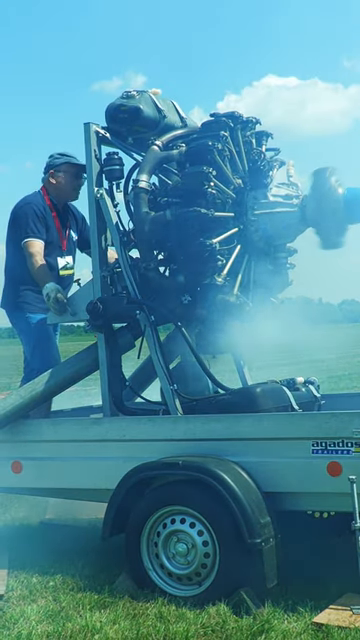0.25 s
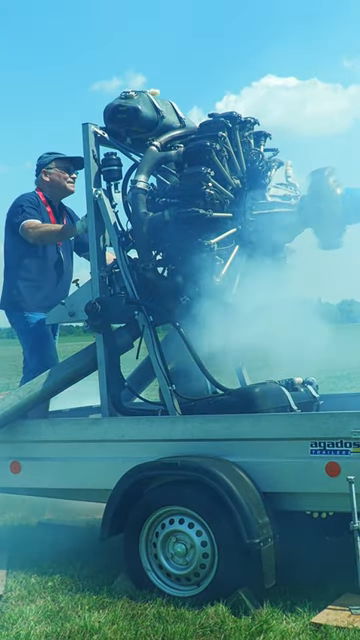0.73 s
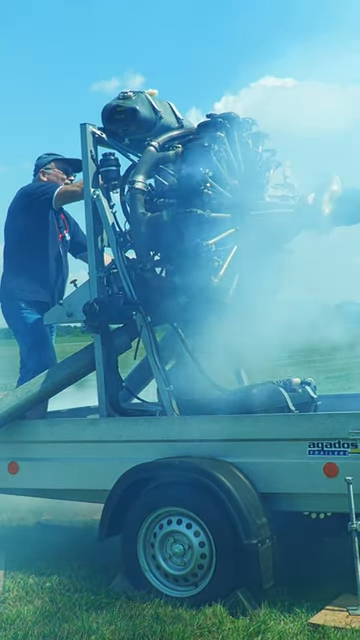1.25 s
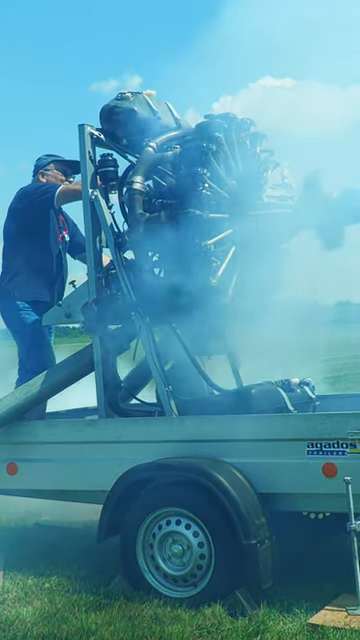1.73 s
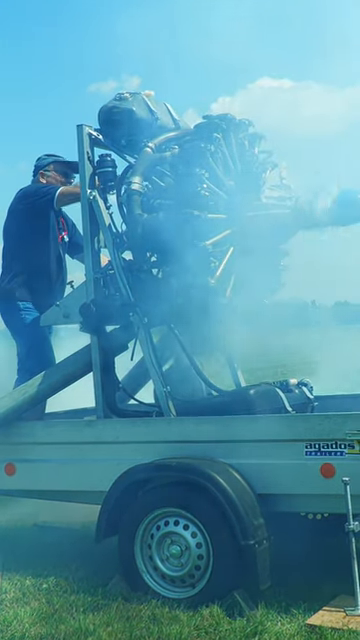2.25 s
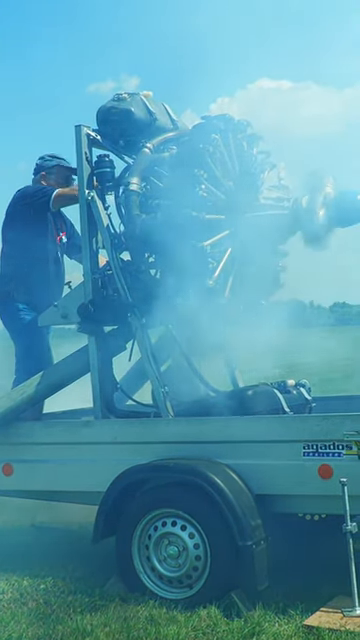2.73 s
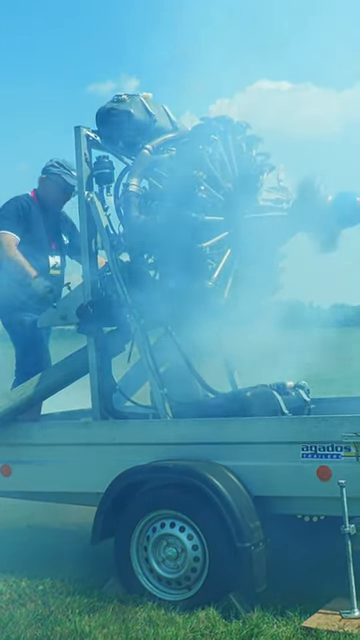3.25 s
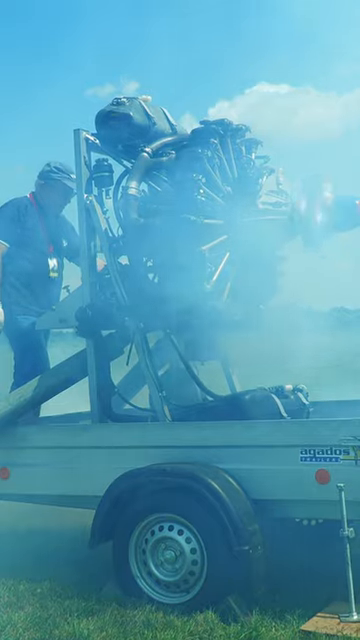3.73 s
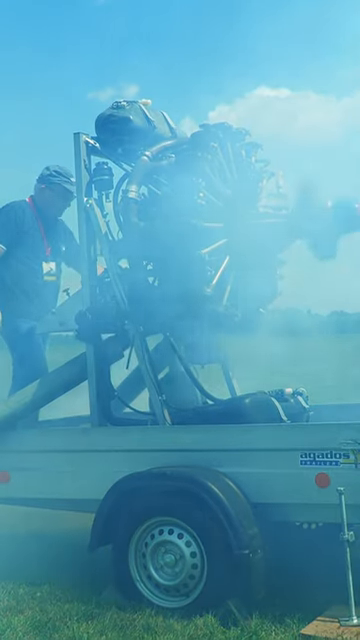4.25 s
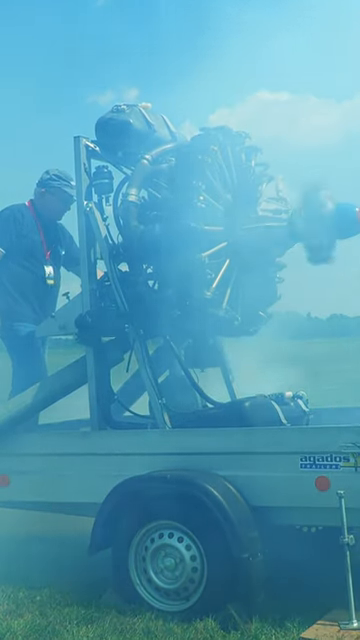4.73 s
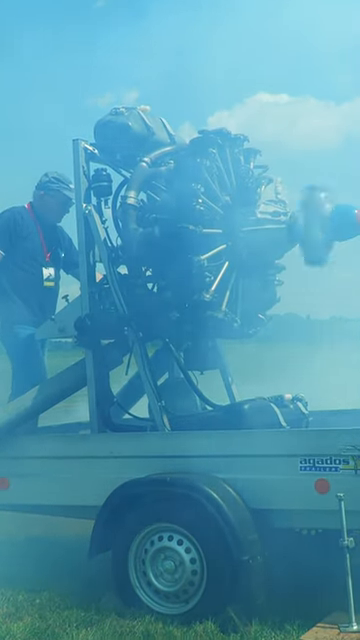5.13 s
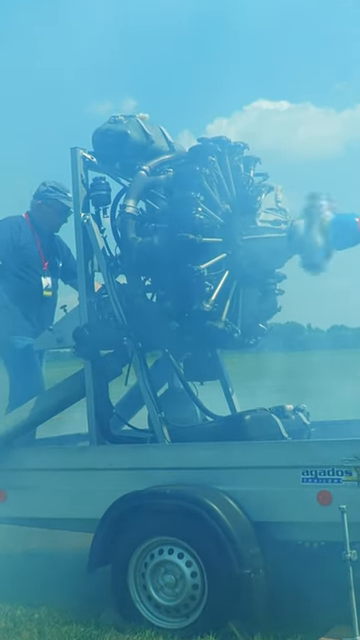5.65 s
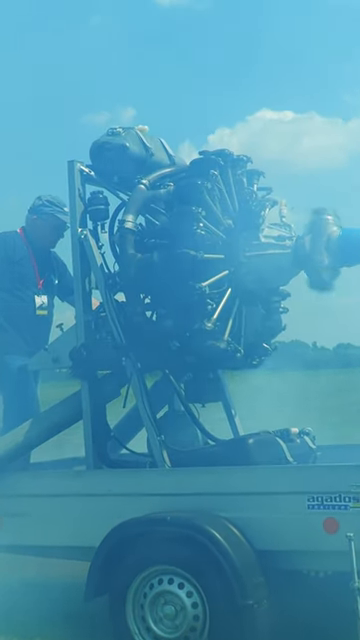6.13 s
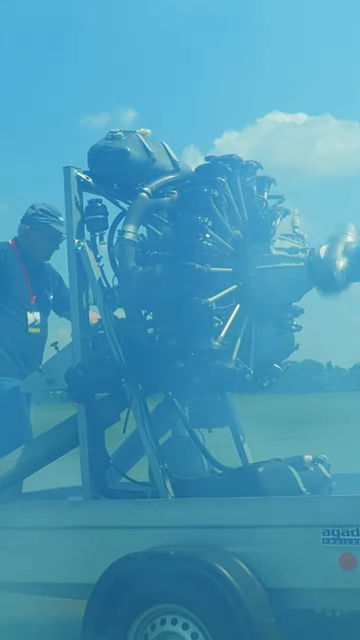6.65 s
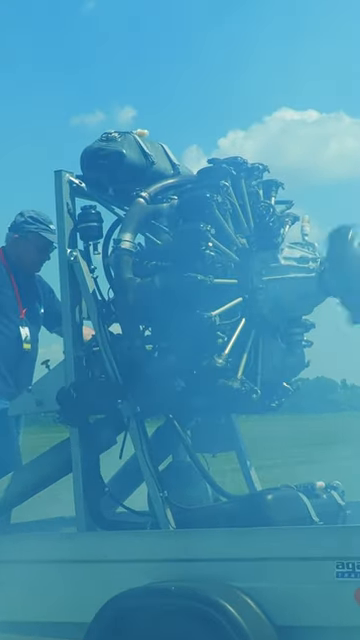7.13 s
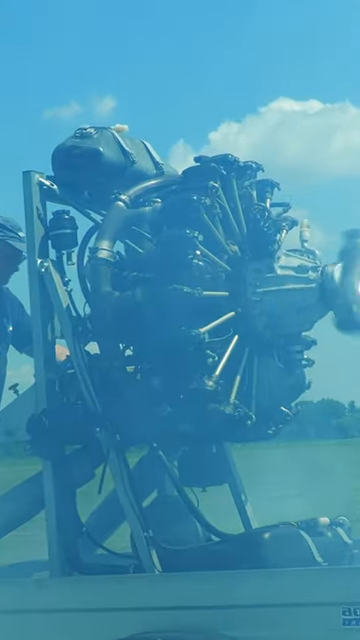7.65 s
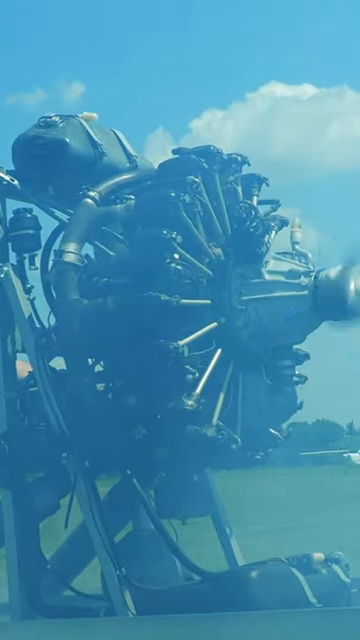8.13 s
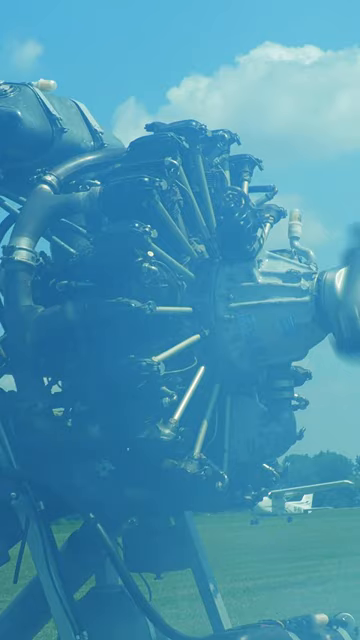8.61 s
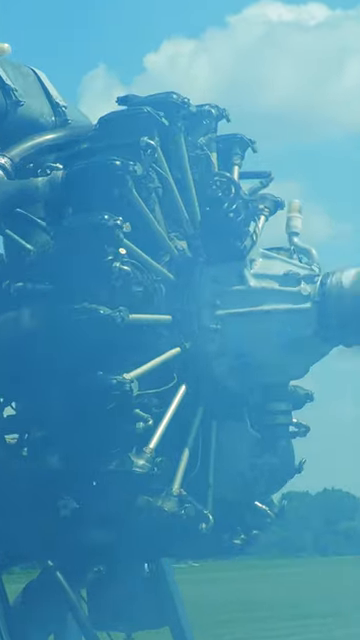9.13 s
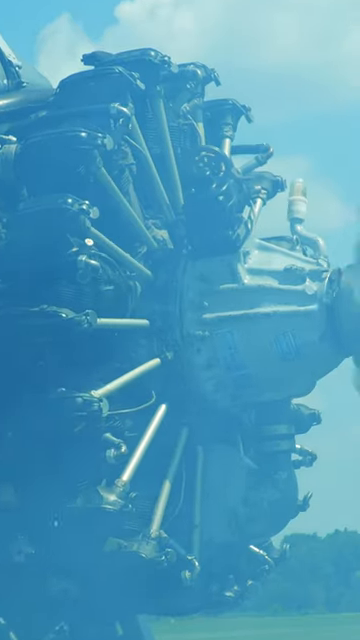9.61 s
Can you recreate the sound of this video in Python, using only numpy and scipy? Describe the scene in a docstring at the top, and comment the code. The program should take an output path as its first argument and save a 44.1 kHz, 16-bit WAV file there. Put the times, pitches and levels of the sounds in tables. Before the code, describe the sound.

A large eighteen-cylinder radial aircraft engine runs on a trailer in an open field, heard close and dry through a small microphone with little deep bass and softly squashed peaks. From 0 s it is already idling, a rapid lumpy thump repeating about eight times a second, filled with low pipe resonances. Some exhaust stacks bark loudly and hollowly in changing patterns, each blast followed by a soft hiss. Broad air roar and fine metallic valve clatter pulse with the firings. Sharp tappet ticks appear near 0.7, 1.3 and 2.3 s. Speed holds fairly steady until about 4.2 s, then sags to around six cycles a second by 6.2 s, the beats becoming more separate. Ticks cluster from 6 to 8 s while the deepest thump weakens. The idle slowly recovers to about seven by the end near 9.9 s, still ragged and barking, without stopping.

```python
"""A rough, thumping idle with barking exhausts: an eighteen-cylinder radial engine on a test trailer in an open
field. It slows markedly towards the middle and partly recovers. Every cylinder fires once in two turns, and the
pulses ring pipe resonances. The short stacks that face the listener bark when their charge lights fully, as
blasts ring their modes; noise puffs hiss out after each of their firings. Random taps on ringing covers make
the valve clatter, a broad noise that swells with the firings makes the roar of air, and metallic ticks ring out
now and then."""
import sys
import numpy as np
from scipy import signal
from scipy.fft import rfft, irfft
from scipy.io import wavfile

SR = 44100
rng = np.random.default_rng(int(sys.argv[2]) if len(sys.argv) > 2 else 0)


def output_pcm(signal):
    """Save a mono or channel-first signal as 16-bit PCM at the path in sys.argv[1].

    Samples are clipped to [-1, 1] before scaling.
    """
    pcm = np.clip(np.atleast_2d(signal).T, -1, 1) * 32767
    wavfile.write(sys.argv[1], SR, np.round(pcm).astype(np.int16))


N = 435708

# engine speed over time: time_s, speed (four-stroke cycles per s)
ENGINE_SPEED = [(0.0, 8.416), (0.26, 7.934), (0.52, 7.819), (0.78, 8.059), (1.04, 8.062), (1.3, 8.106),
                (1.56, 8.07), (1.82, 8.093), (2.08, 8.065), (2.34, 8.293), (2.6, 8.271), (2.86, 7.976),
                (3.12, 8.134), (3.38, 8.114), (3.64, 8.066), (3.9, 8.243), (4.16, 8.14), (4.42, 7.778),
                (4.68, 7.672), (4.94, 7.342), (5.2, 7.004), (5.46, 6.804), (5.72, 6.566), (5.98, 6.278),
                (6.24, 6.084), (6.5, 6.125), (6.76, 6.383), (7.02, 6.442), (7.28, 6.396), (7.54, 6.511),
                (7.8, 6.687), (8.06, 6.764), (8.32, 6.534), (8.58, 6.555), (8.84, 6.602), (9.1, 6.912),
                (9.36, 6.83), (9.62, 6.838), (9.88, 7.018)]
# cylinders in firing order: collector_fast_db (at high speed), collector_slow_db (at low speed),
# lead_share (how far it follows its group lead, 0-1), ringing_db (into the ringing pipes)
CYLINDER_FEEDS = [(-18, -19, .3, -50), (-9, -12, .2, -50), (-18, -18, .1, -31), (-20, -20, .1, -50),
                  (-24, -26, 1, -15), (-14, -30, .3, -24), (-22, -26, .5, -23), (-19, -24, .2, -50),
                  (-25, -25, 1, -12), (-15, -17, .6, -20), (-11, -10, .5, -50), (-21, -17, .3, -23),
                  (-30, -25, .3, -21), (-15, -20, 1, -15), (-9, -12, .2, -50), (-11, -22, .1, -38),
                  (-11, -22, .1, -38), (-28, -34, 1, -15)]
CYLINDER_COUNT = len(CYLINDER_FEEDS)


def from_db(db):
    """Level in dB to amplitude factor."""
    return 10 ** (np.asarray(db) / 20)


def rms_one(x):
    """Scale a signal to rms 1."""
    return x / np.sqrt(np.mean(x ** 2) + 1e-20)


def in_time(rows):
    """Draw each column of a table as a curve over the whole scene, straight between its times in s."""
    time_s, *columns = np.transpose(rows)
    return [np.interp(np.arange(N) / SR, time_s, column) for column in columns]


def clicks(at, sizes):
    """Impulses of the given sizes at the given samples."""
    return np.bincount(np.clip(at, 0, N - 1), sizes, N) + 1e-18


def ring(x, hz, t60_s):
    """A damped mode: a unit click sets a sine of starting height 1 ringing, down 60 dB after t60_s."""
    radius = from_db(-60 / (t60_s * SR))
    angle = 2 * np.pi * hz / SR
    return signal.lfilter([0, np.sin(angle)], [1, -2 * radius * np.cos(angle), radius ** 2], x)


def resonance(x, hz, width_hz):
    """A band-pass resonance: the narrower its width, the longer it rings."""
    radius = np.exp(-np.pi * width_hz / SR)
    gain = (1 - radius ** 2) / 2
    return signal.lfilter([gain, 0, -gain], [1, -2 * radius * np.cos(2 * np.pi * hz / SR), radius ** 2], x)


def puff(x, rise_s, fall_s):
    """Pressure swell: an exponential decay, smoothed at its onset, follows each impulse."""
    rise, fall = np.exp(-1 / (rise_s * SR)), np.exp(-1 / (fall_s * SR))
    decaying = signal.lfilter([1], [1, -fall], x)
    return signal.lfilter([1 - rise], [1, -rise], decaying)


def coloured(spectrum):
    """Steady noise shaped by rows of frequency in Hz and relative level in dB per Hz, rms 1."""
    hz, level_db = np.transpose(spectrum)
    log_hz = np.log(np.arange(N // 2 + 1) * SR / N + 1)
    shape = from_db(np.interp(log_hz, np.log(hz), level_db))
    return rms_one(irfft(rfft(rng.standard_normal(N)) * shape, N))


def firing_order():
    """Cylinder and sample of every firing, evenly spaced within each four-stroke cycle."""
    firings_so_far = np.cumsum(in_time(ENGINE_SPEED)[0]) / SR * CYLINDER_COUNT
    number = np.arange(int(firings_so_far[-1]))
    return number % CYLINDER_COUNT, np.searchsorted(firings_so_far, number)


def bark_rows():
    """Firing number, sample, blast dB and hiss dB of each bark: half-lit by habit, changed during a spell."""
    # cylinders whose stacks face the listener, with a half-lit charge:
    # place (in firing order), delay_ms, blast_db, hiss_db (relative levels)
    near_stacks = [(4, 0.57, -18.5, -35), (8, -1.84, -23.5, -31.5), (10, -1, -19.5, -34.5),
                   (13, -0.06, -20, -42), (15, -2.5, -24, -72), (17, -0.03, -24.5, -43)]
    # spells in which one lights more fully on every cycle, or all but dies out:
    # start_s, end_s, place (in firing order), blast_db, hiss_db
    lit_spells = [(0.0, 0.1, 8, -10.0, -25.0), (0.0, 1.7, 4, -12.0, -27.0), (0.19, 0.29, 17, -10.0, -24.0),
                  (0.38, 0.48, 8, -11.0, -24.0), (0.57, 1.17, 17, -11.0, -24.0), (1.2, 2.0, 17, -18, -32),
                  (1.25, 2.09, 8, -11.0, -25.0), (1.3, 4.3, 10, -21, -31), (1.53, 3.6, 13, -13.0, -27.0),
                  (1.85, 2.55, 4, -29, -35), (2.05, 2.64, 17, -10.0, -25.0), (2.1, 2.9, 8, -18, -29),
                  (2.79, 2.89, 17, -11.0, -24.0), (2.97, 3.07, 8, -15, -24.0),
                  (3.28, 3.38, 17, -11.0, -23.0), (3.44, 4.16, 4, -14.0, -27.0),
                  (3.47, 3.57, 8, -11.0, -22.0), (3.65, 4.0, 17, -11.0, -24.0),
                  (3.75, 3.85, 13, -15.0, -25.0), (4.08, 4.18, 8, -15.0, -24.0),
                  (4.24, 4.34, 13, -11.0, -27.0), (4.27, 4.75, 17, -14.0, -25.0), (4.5, 4.62, 4, -17, -27),
                  (4.85, 4.95, 4, -18, -27), (4.85, 5.65, 8, -14.0, -25.0), (4.89, 5.41, 13, -15.0, -27.0),
                  (5.1, 5.7, 15, -15, -34), (5.5, 6.65, 13, -30, -38), (5.68, 5.94, 4, -12.0, -26.0),
                  (5.68, 6.62, 8, -15, -26.5), (5.95, 6.3, 4, -18, -29), (5.2, 6.65, 17, -28, -38),
                  (6.32, 6.59, 4, -15.0, -25.0), (6.73, 7.9, 13, -12, -27.0), (6.75, 8.1, 4, -32, -39),
                  (6.75, 7.6, 8, -23, -36), (8.3, 9.5, 13, -30, -40), (6.76, 7.18, 17, -15.0, -25.0),
                  (7.0, 8.4, 15, -14, -32), (7.39, 7.64, 17, -14.0, -25.0), (7.76, 7.86, 8, -11, -24),
                  (7.9, 8.31, 8, -16, -24), (8.1, 8.2, 13, -12.0, -33.0), (8.3, 8.6, 4, -16, -29),
                  (8.44, 8.54, 17, -13.0, -25.0), (8.63, 8.88, 4, -14.0, -26.0),
                  (8.67, 8.92, 8, -13.0, -24.0), (8.9, 9.88, 15, -15, -35), (8.95, 9.03, 4, -18, -29),
                  (9.04, 9.14, 17, -16, -25.0), (9.08, 9.18, 4, -16, -25.0), (9.25, 9.5, 4, -16, -29),
                  (9.26, 9.36, 8, -14, -24.0), (9.4, 9.75, 8, -32, -36), (9.48, 9.72, 17, -12.0, -25.0),
                  (9.52, 9.76, 4, -16.0, -25.0)]
    bark_spread_db = 1.1   # from one bark to the next
    cylinder, at = firing_order()
    delay_ms, blast_db, hiss_db = np.full((3, len(at)), np.nan)
    for place, *habit in near_stacks:
        mine = cylinder == place
        delay_ms[mine], blast_db[mine], hiss_db[mine] = habit
    for start_s, end_s, place, *spell in lit_spells:
        in_spell = (cylinder == place) & (at >= start_s * SR) & (at <= end_s * SR)
        blast_db[in_spell], hiss_db[in_spell] = spell
    number = np.flatnonzero(np.isfinite(delay_ms))
    vary_db = bark_spread_db * rng.standard_normal((2, len(number)))
    when = at + delay_ms / 1000 * SR
    return number, when[number].astype(int), blast_db[number] + vary_db[0], hiss_db[number] + vary_db[1]


def firings(barks, scatter_ms, burn_db, follows, spread_db):
    """Impulses into the collector and the ringing pipes; each cylinder's strength and timing wander slowly."""
    # exhaust valves open unevenly round the star: lateness (share of the gap between firings)
    valve_lateness = [.23, .56, .57, .35, .64, .76, .73, .31, .66, .7, .67, .65, .48, .62, .68, .51, .24,
                      .73]
    # places in firing order; each leads the cylinders that fire up to the next lead
    lead_places = [4, 8, 13, 17]
    full_blast_db = -12                 # the group burns weaker as its lead's blast falls short of this
    ringing_follows = 0.64              # share of the lead's shortfall heard in the ringing pipes
    low_speed, high_speed = 6.9, 7.8    # cycles per s
    habit_kept = 0.82                   # likeness of a cylinder's burning from one cycle to the next

    cylinder, at = firing_order()
    number, _, blast_db, _ = barks
    fast_db, slow_db, lead_share, ringing_db = np.array(CYLINDER_FEEDS)[cylinder].T
    speed = in_time(ENGINE_SPEED)[0][at]
    quickness = np.clip((speed - low_speed) / (high_speed - low_speed), 0, 1)
    collector_db = slow_db + (fast_db - slow_db) * quickness

    # each cylinder remembers its own firing one cycle ago
    memory = np.r_[1, np.zeros(CYLINDER_COUNT - 1), -habit_kept]
    fresh = rng.standard_normal((len(at), 2))
    timing_chance, burn_chance = signal.lfilter([np.sqrt(1 - habit_kept ** 2)], memory, fresh, axis=0).T

    # every firing takes the latest lead; those before the first lead take the last of all
    is_lead = np.isin(cylinder[number], lead_places)
    latest_lead = np.searchsorted(number[is_lead], np.arange(len(at)), "right") - 1
    short_db = blast_db[is_lead][latest_lead] - full_blast_db

    strength_db = burn_db[at] + spread_db * burn_chance
    valve_late_s = np.array(valve_lateness)[cylinder] / (speed * CYLINDER_COUNT)
    late_s = valve_late_s + scatter_ms[at] * timing_chance / 1000
    when = at + (late_s * SR).astype(int)
    collector = clicks(when, from_db(strength_db + collector_db + lead_share * follows[at] * short_db))
    ringing = clicks(when, from_db(strength_db + ringing_db + ringing_follows * short_db))
    return collector, ringing


def pipes(train, modes):
    """Firing pulses ring the pipe modes, neighbours in opposite sign."""
    out = np.zeros(N)
    for k, (hz, width_hz, level_db) in enumerate(modes):
        rung = resonance(resonance(train, hz, width_hz), hz, 2 * width_hz)
        out += (-1) ** k * from_db(level_db) * rung
    return out


def exhaust_beat(collector, ringing, ringing_level_db):
    """The thump of the exhaust: firing pulses ring the longest pipe, the collector and the ringing pipes."""
    # longest pipe: pitch_hz, width_hz, level_db (relative)
    longest_pipe = [(62.4, 23, 10.5)]
    # collector pipes: pitch_hz, width_hz, level_db (relative)
    collector_pipes = [(136.4, 45.7, 8.5), (345, 57, -5.5)]
    # pipes fed mostly by the group leads: pitch_hz, width_hz, level_db (relative)
    lead_pipes = [(175.7, 38.2, 15.5), (208.8, 35, 6.5), (337.4, 59, 1)]
    # how strongly the longest pipe thumps: time_s, level_db (added to that pipe's own)
    thump_level = [(0, 4), (1, 2), (1.7, 3.5), (2.4, 3), (3.2, 2), (3.9, 5), (4.7, 3), (5.5, 3),
                   (6.5, -2.5), (8.5, -2.5), (9.88, -1)]
    thump = from_db(in_time(thump_level)[0]) * pipes(collector, longest_pipe)
    lead_ringing = from_db(ringing_level_db) * pipes(ringing, lead_pipes)
    return from_db(36) * (thump - pipes(collector, collector_pipes) - lead_ringing)


def stack_barks(collector, barks):
    """Ragged blasts ring the modes of the short stacks; the train of all firings rings them faintly."""
    # short stacks: pitch_hz, t60_s, level_db (relative)
    stack_modes = [(330, 0.042, -10), (507.7, 0.11, -4), (663, 0.085, -6), (783.5, 0.057, -3.5),
                   (838.5, 0.057, -4), (990, 0.1, -11.5), (1880, 0.019, -6)]
    # the pitch that each near stack favours: place in firing order to pitch_hz
    favoured_hz = {4: 790, 8: 880, 10: 850, 13: 650, 15: 850, 17: 860}
    lift_peak_db, lift_octaves = 6.5, 0.18   # lift of modes near that pitch, and its width
    stack_detune = 0.03                      # gas heat shifts the pitch from bark to bark (share)
    number, at, blast_db, _ = barks
    own_hz = np.array([favoured_hz[place] for place in number % CYLINDER_COUNT])
    mode_chance = rng.standard_normal((len(at), len(stack_modes)))
    turbulence = from_db(-30) * rng.standard_normal(N)   # drags the blast out over a few ms
    heat = rng.integers(-1, 2, len(at))                  # cool, middling or hot gas: -1, 0, 1
    out = np.zeros(N)
    for k, (hz, t60_s, mode_db) in enumerate(stack_modes):
        lift_db = lift_peak_db * np.exp(-(np.log2(hz / own_hz) / lift_octaves) ** 2)
        bark = from_db(blast_db + mode_db + lift_db - 8 + 1.5 * mode_chance[:, k])
        for shift in (-1, 0, 1):
            blast = clicks(at, (heat == shift) * bark)
            if shift == 0:
                blast += from_db(mode_db - 16) * collector
            ragged = turbulence * puff(blast, 0.00053, 0.006)
            push = (-1) ** k * from_db(0.5) * blast + from_db(-0.5) * ragged
            out += ring(push, hz * (1 + stack_detune * shift), t60_s)
    return out


def gas_hiss(barks):
    """Gas hisses out after each near firing: soft puffs of noise in three bands, some jets darker than others."""
    # spectrum of the escaping gas: pitch_hz, level_db (per Hz, relative)
    gas_spectrum = [(900, 15), (1500, 2), (2700, 3.5), (4500, 3), (6500, 5), (8500, 2.5), (11000, -8),
                    (15800, -11.5)]
    _, at, _, hiss_db = barks
    low_tilt, high_tilt = rng.standard_normal((2, len(at)))
    hiss = coloured(gas_spectrum)
    dull = signal.sosfilt(signal.butter(2, 5200, fs=SR, output="sos"), hiss)
    air = signal.sosfilt(signal.butter(2, 10500, "high", fs=SR, output="sos"), hiss)
    middle = hiss - dull - air
    out = np.zeros(N)
    for band, tilt_db in ((dull, 2.6 * low_tilt), (middle, 0), (air, 2.5 * high_tilt)):
        jet = clicks(at, from_db(hiss_db + tilt_db + 12))
        # repeated smoothing rounds the onset
        swell = puff(puff(puff(jet, 0.0036, 0.0021), 0.0036, 1 / SR), 0.0028, 1 / SR)
        out += swell * band
    return out


def air_roar():
    """The broad roar of air: steady noise of a fixed spectrum."""
    # spectrum of the roar: pitch_hz, level_db (per Hz, relative)
    roar_spectrum = [(40, -14), (90, -6.5), (200, -8.5), (343, -5), (419, -17), (499, -14), (595, -24),
                     (823, -13), (1300, -24.5), (2600, -21), (4850, -23.5), (8400, -34.5), (11000, -43.5),
                     (13500, -41), (15800, -47)]
    return coloured(roar_spectrum)


def valve_gear(taps_per_s):
    """Dense uneven taps of rockers and tappets ring the covers, each mode with its own random taps."""
    # ringing of covers and cooling fins: pitch_hz, t60_s, level_db (relative)
    cover_modes = [(1720, 0.0078, -10), (2260, 0.0016, 20), (2542, 0.021, 8.5), (3110, 0.07, -2),
                   (3854, 0.052, 3.5), (4710, 0.021, 8), (6150, 0.01, 5)]
    out = np.zeros(N)
    for hz, t60_s, level_db in cover_modes:
        struck = rng.random(N) < taps_per_s / SR
        size = from_db(3.9 * np.minimum(rng.exponential(1, N), 4))
        taps = struck * size * rng.choice([-1, 1], N)
        out += from_db(level_db) * ring(taps + 1e-18, hz, t60_s)
    return rms_one(out)


def ticks():
    """Metallic ticks now and then: each click rings three modes of the struck metal at slightly varied
    strength."""
    # loud metallic ticks: start_s, level_db (of the strike, before its random spread)
    tick_times = [(0.748, -27), (1.3016, -24), (2.3487, -31), (6.093, -24), (6.2543, -28), (6.419, -28),
                  (6.58, -28), (6.97, -29), (7.1287, -29), (7.282, -31), (7.4376, -27), (7.5313, -38),
                  (7.819, -23), (8.013, -30), (8.8776, -26.5), (9.5363, -28)]
    # ringing of the struck metal: pitch_hz, t60_s
    struck_metal = [(1850, 0.063), (2690, 0.061), (4950, 0.07)]
    start_s, level_db = np.transpose(tick_times)
    at = (start_s * SR).astype(int)
    out = np.zeros(N)
    for hz, t60_s in struck_metal:
        strike = clicks(at, from_db(level_db + 2 * rng.standard_normal(len(at))))
        out += ring(strike, hz, t60_s)
    return out


def scene():
    """Mix exhaust beat, barks, hiss, roar, clatter and ticks as the running state changes."""
    # running state: time_s, noise_db (air roar and valve clatter), scatter_ms (ignition), ringing_db (pipes),
    # burn_db, follows (share of the lead's shortfall, 0-1)
    running_state = [(0, -22, 0.2, 4, -2, 0.3), (1, -22, 0.18, 8, -0.5, 0.4), (1.6, -22, 0.31, 1, -2, 0.5),
                     (2.3, -23, 0.27, 2, -0.5, 0), (3, -22.5, 0.15, 1, -1, 0.3),
                     (4.2, -22.5, 0.31, 1.5, 0, 0.56), (5.6, -22, 0.23, 4, -2.5, 0.4),
                     (6.6, -25, 0.31, 0, 1.5, 0.1), (7.3, -24, 0.35, 4, -0.5, 0.2),
                     (8.1, -22, 0.37, 2, -0.5, 0), (9, -24, 0.36, 0.5, 1.5, 0.55),
                     (9.88, -22.5, 0.25, 3, 0, 0.43)]
    noise_db, scatter_ms, ringing_db, burn_db, follows = in_time(running_state)
    barks = bark_rows()
    collector, ringing = firings(barks, scatter_ms, burn_db, follows, spread_db=1.6)
    beat = exhaust_beat(collector, ringing, ringing_db)
    # roar and clatter swell with every firing
    breathing = rms_one(1.1 + rms_one(puff(collector + 2 * ringing, 0.005, 0.008)))
    roar = from_db(noise_db) * breathing * air_roar()
    clatter = from_db(noise_db - 13.5) * breathing * valve_gear(taps_per_s=74)
    mix = beat + stack_barks(collector, barks) + gas_hiss(barks) + roar + clatter + ticks()
    return mix[None]


def record(dry):
    """Small microphone without deep bass; peaks are squashed, the top is cut."""
    ceiling, cutoff_hz = 0.52, 15960   # full scale is 1; the cut is 70 dB deep from the cutoff upward
    thin = signal.sosfilt(signal.butter(4, 45, "high", fs=SR, output="sos"), dry)
    squashed = ceiling * np.tanh(thin / ceiling)
    return signal.sosfilt(signal.cheby2(28, 70, cutoff_hz, fs=SR, output="sos"), squashed)


dry = scene()
out = record(dry)
output_pcm(out)
```